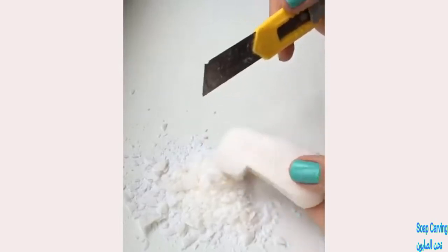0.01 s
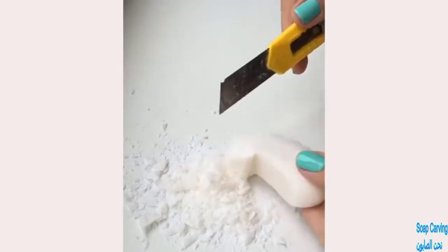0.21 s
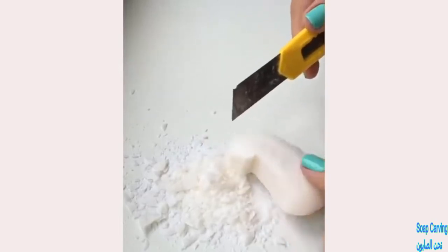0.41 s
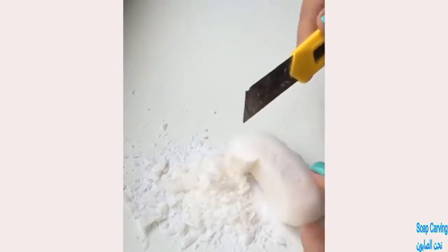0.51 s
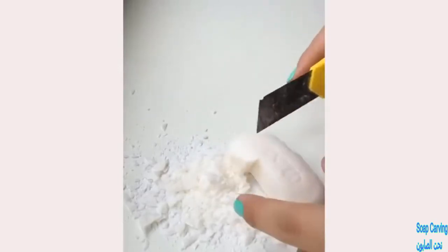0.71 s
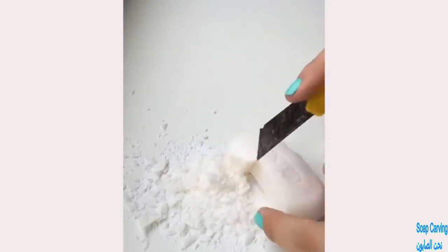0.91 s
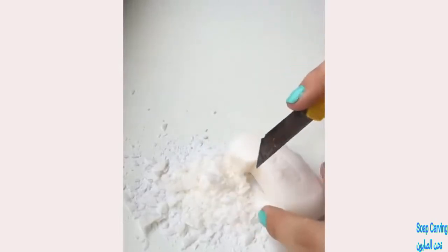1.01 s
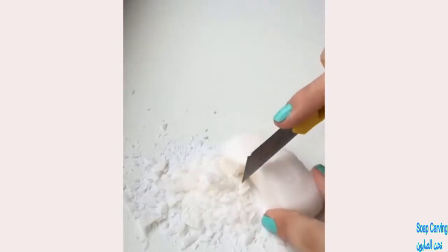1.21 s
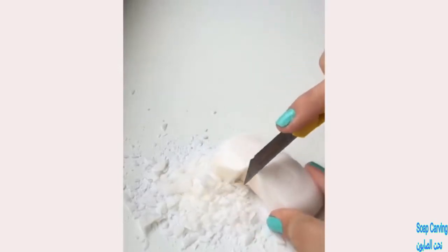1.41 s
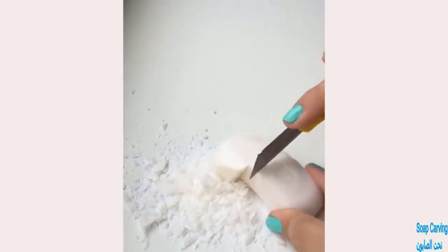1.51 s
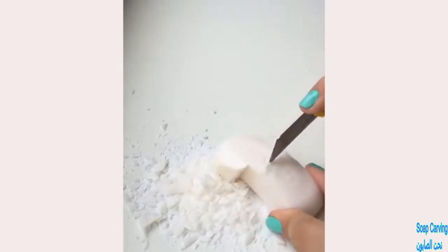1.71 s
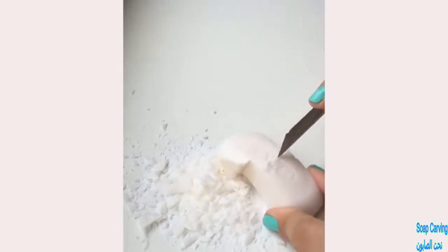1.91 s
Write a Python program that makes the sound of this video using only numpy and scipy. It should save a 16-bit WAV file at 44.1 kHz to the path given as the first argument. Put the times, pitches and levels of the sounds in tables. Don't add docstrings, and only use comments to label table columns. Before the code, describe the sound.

Soap bar knocking on a hollow table: faint shifting and low hum, then one loud, short, boomy woody blow at 0.2 s with a bright crack. Near quiet until a blade tick at 0.79 s and a sharp bite click at 0.9. A soft, dry, crumbly scrape runs uneven to about 1.55 s, with thin metallic singing and low table rumble. Brief scrape at 1.79, crisp release click at 1.84, faint blade ring. Close, small quiet room.

```python
import sys
import numpy as np
from scipy import signal
from scipy.fft import rfft, irfft, next_fast_len
from scipy.io import wavfile
from scipy.ndimage import uniform_filter1d, map_coordinates

SR = 44100
rng = np.random.default_rng(int(sys.argv[2]) if len(sys.argv) > 2 else 0)


def file_out(sig):
    cols = np.atleast_2d(sig).T
    lim = np.clip(cols, -1, 1)
    pcm = np.round(lim * 32767).astype(np.int16)
    wavfile.write(sys.argv[1], SR, pcm)


def amplitude_ratio(level_db):
    exponent = np.asarray(level_db, float) / 20
    return 10 ** exponent


N = 88200
TIME_S = np.arange(N) / SR

# pitch_hz, level_db, t60_s (time to fade by 60 dB)
TABLE_TONES = [(172.5, -13, 0.14), (245.6, -17, .11), (290, -13.5, 0.081), (362.8, -16, 0.11),
               (486, -17, 0.053), (531, -5.5, .06), (640, -3, .045), (780, -17, .05), (1003, -9.5, .035),
               (466.9, 4, 0.011), (1420, -28.5, 0.027), (2026, -22.5, 0.033), (2240, -18.5, 0.033),
               (2580, -25.5, .03)]
# start_s, level_db, contact_ms
TABLE_BLOWS = [(.2007, -5, 0.34), (.268, -35.5, 0.7), (.32, -46, 0.74), (.0705, -52.5, 0.37),
               (.167, -52, .5), (.8176, -43, 0.55), (.9345, -48, 0.25), (.946, -46, 0.74),
               (1.483, -47.5, .5), (1.497, -50.5, 0.76), (1.545, -47.5, 0.9), (1.775, -48, 1.73),
               (1.822, -53.5, 0.6)]
# time_s, scrape_db, table_load_db
LONG_STROKE = [(0, -72.5, -52.5), (.1, -78, -67), (.19, -72, -62.5), (.4, -71.5, -62.5), (.62, -99, -81.5),
               (.81, -74.5, -72.5), (.897, -73, -61), (.915, -54, -59.5), (1.04, -60, -60.5),
               (1.09, -65.5, -70), (1.15, -55.5, -59), (1.21, -60, -63), (1.29, -57.5, -63.5),
               (1.43, -57, -62), (1.489, -54.5, -52), (1.55, -60, -63), (1.6, -70, -71), (1.699, -68, -69)]
SHORT_STROKE = [
    (1.789, -53.5, -58),
    (1.82, -59.5, -63),
    (1.868, -62.5, -73),
    (1.99, -80.5, -79.5),
]


def blows():
    # pitch_hz, level_db
    thud_colour = [(45, -8), (90, -12), (170, -2), (300, 0), (560, -0.76), (1100, -13), (2500, -21.5),
                   (5000, -36)]
    # pitch_hz, t60_s
    thud_fade = [(40, .4), (170, 0.16), (520, .22), (1000, .17), (2500, .15)]
    thud_db, linger_db, linger_times = -21.5, -19.5, 2.2
    attack_s, low_cut_hz = 0.00051, 146
    held_damping, held_tilt_db = 0.69, -3

    slow_fade = [(hz, linger_times * t60) for hz, t60 in thud_fade]
    pitches = np.transpose(TABLE_TONES)[0]
    rung, thuds = np.zeros(N + SR), np.zeros(N + SR)
    t = np.arange(SR // 2) / SR
    for k, (start_s, level_db, contact_ms) in enumerate(TABLE_BLOWS):
        held = k > 0
        changes_db = held * (rng.normal(0, 4, len(TABLE_TONES)) + held_tilt_db * np.log2(pitches / 500))
        ring = np.zeros(len(t))
        for (hz, tone_db, t60), change_db in zip(TABLE_TONES, changes_db):
            fade_db = -60 * t / t60 / held_damping ** held
            ring += amplitude_ratio(tone_db + change_db + fade_db) * np.sin(2 * np.pi * hz * t)
        ring *= 1 - np.exp(-t / attack_s)
        push = np.hanning(int(contact_ms * SR / 1000) + 3)
        start = round(start_s * SR)
        rung[start:][:len(t)] += amplitude_ratio(level_db) * np.convolve(ring, push / push.sum())[:len(t)]
        thud = decaying(thud_fade) + amplitude_ratio(linger_db) * decaying(slow_fade)
        thuds[start:][:len(t)] += amplitude_ratio(level_db + thud_db) * thud * (1 - np.exp(-t / 0.001))

    colour = lambda f: amplitude_ratio(along(thud_colour + [(12000, -69.5)], f))
    loss = np.sqrt(np.mean(colour(np.linspace(0, SR / 2, 2000)) ** 2))
    after_hard_blow = TIME_S > TABLE_BLOWS[0][0]
    thuds = filtered(thuds, colour)[:N] / loss * after_hard_blow
    return filtered(rung[:N], lambda f: (1j * f / (low_cut_hz + 1j * f)) ** 2) + thuds


def snaps():
    # peak_s, level_db, rise_ms, t60_ms
    snap_groups = [
        [(.2012, -24.5, 0.46, 20), (.2055, -25.5, 1.6, 22)],
        [(.7905, -41, 0.34, 23), (.808, -58.5, 1.47, 25), (.82, -60, 1.7, 25), (.843, -60.5, 1.1, 35),
         (1.468, -50.5, 3.4, 60), (1.484, -50.5, .6, 29), (1.497, -53.5, 1.1, 39)],
        [(.8982, -35, 1.07, 18), (.9000, -25.5, 0.68, 12), (.9025, -34.5, 0.53, 14), (.910, -48, 2.5, 60),
         (.968, -51.5, 1.2, 33), (1.178, -55, 0.46, 12), (1.822, -64, 0.61, 15)],
        [(1.8403, -31.5, 0.54, 12.3), (1.8445, -40.5, 1.1, 14), (1.853, -53.5, 2.5, 70), (1.546, -52, 2.4, 42),
         (1.5, -57.5, 2.8, 140)],
        [(.002, -52.5, 0.5, 41), (.03, -65, 1.8, 46), (.071, -60, 0.91, 25), (.142, -61.5, 1, 36),
         (.168, -61, 1.1, 58), (.42, -68, 6, 82)],
        [(.2097, -30.5, .4, 18), (.003, -66, .6, 55), (.055, -66, 7.6, 170), (.085, -63.5, 1.2, 30),
         (.185, -62, 6.2, 54), (.238, -58, 1.1, 60)],
    ]
    # pitch_hz, width_hz, level_db
    snap_peaks = [
        [(2220, 500, 3.5), (3800, 1100, 1.5), (5190, 400, 2.5), (7530, 500, -7.5), (9050, 300, -14),
         (12200, 500, -3)],
        [(1680, 720, -12.5), (2600, 260, 5), (3700, 270, -1), (5640, 210, 7.5), (7800, 240, -5),
         (10460, 400, -20), (12270, 490, -12)],
        [(2660, 400, 1.5), (4720, 450, 0.5), (6100, 370, -3), (7080, 470, 5), (8610, 440, -1), (9580, 490, 3),
         (10250, 310, -1), (12900, 690, 0)],
        [(1480, 136, -14), (2960, 320, 6), (4100, 260, -4.5), (5370, 200, 1.5), (6500, 210, -8),
         (9100, 320, -7.5), (11300, 220, -2.5), (12000, 340, 1.5), (13130, 550, -6.5)],
        [(2200, 360, 2), (3100, 500, -3.5), (4120, 500, 1), (5300, 300, -2.5), (8500, 900, -9.5)],
        [(8600, 900, -4.5), (10800, 1200, -1), (12800, 1200, 1.5)],
    ]
    plain_db = [-3, -6, -6.5, -13.5, -14, -12]
    low_cuts = [1500, 909, 1880, 1900, 1200, 4000]
    first_cracks = [3, 2.9, 3.9, 2.8, 1.5, 3.5]

    lead = -(-SR // 40)
    t = np.arange(-lead, SR // 8) / SR
    out = np.zeros(N + SR)
    for rows, peaks, noise_db, low_hz, crack in zip(snap_groups, snap_peaks, plain_db, low_cuts, first_cracks):
        colour = lambda f: (amplitude_ratio(noise_db) + ringing(peaks, f)) * (1j * f / (low_hz + 1j * f)) ** 3
        for peak_s, level_db, rise_ms, t60_ms in rows:
            swell = np.exp(-(t * 600 / rise_ms) ** 2)
            fade = amplitude_ratio(-60000 * np.maximum(t, 0) / t60_ms)
            noise = np.where(t == 0, -crack, rng.standard_normal(len(t)))
            burst = filtered(noise * np.where(t < 0, swell, fade), colour)
            out[round(peak_s * SR):][:len(t)] += amplitude_ratio(level_db) * burst / np.std(filtered(noise, colour))
    return out[lead:][:N]


def scraping():
    # pitch_hz, level_db
    crumble_colour = [(300, -36), (1000, -3), (2200, -3), (4000, -1.5), (8000, -2.5), (14000, 0.5)]
    # pitch_hz, width_hz, level_db
    blade_tones = [(1454, 220, -4), (3000, 100, -5.5), (4080, 200, -4), (5500, 200, -2), (5680, 170, -0.5),
                   (5930, 170, -2), (6992, 150, -10.5), (8300, 300, -8), (10900, 400, -8.5),
                   (11900, 640, -8), (13700, 300, -7.5)]
    # time_s, level_db
    sing_level = [(0, -16), (1.05, -12.5), (1.14, -11), (1.3, -6.5), (1.45, -3.5), (1.6, -12.5), (1.75, -8),
                  (2, -13.5)]

    rub = rubbing()
    crumble = patchy(filtered(rub, lambda f: amplitude_ratio(along(crumble_colour, f))), depth_db=3.0)
    blade = lambda f: np.sqrt(sum(abs(ringing([tone], f)) ** 4 for tone in blade_tones))
    sing = patchy(filtered(rub[::-1], blade), depth_db=1.17)
    sing *= amplitude_ratio(np.interp(TIME_S, *np.transpose(sing_level)))
    time_s, scrape_db, _ = np.transpose(LONG_STROKE + SHORT_STROKE)
    return (crumble + sing) * amplitude_ratio(np.interp(TIME_S, time_s, scrape_db) + 1.3 * wobble(45))


def table_load():
    # pitch_hz, level_db
    load_colour = [(90, -16), (170, 3.5), (500, -7), (1100, -16), (2500, -17)]

    wood = [(hz, 4.1 / t60, -.1) for hz, _, t60 in TABLE_TONES[:9]]
    pressure = rng.standard_normal(N) * amplitude_ratio(2.2 * wobble(30))
    colour = lambda f: amplitude_ratio(along(load_colour, f)) * (.2 + np.abs(ringing(wood, f)))
    time_s, _, load_db = np.transpose(LONG_STROKE + SHORT_STROKE)
    return unit(filtered(pressure, colour)) * amplitude_ratio(np.interp(TIME_S, time_s, load_db))


def sliding_bar():
    # time_s, level_db
    slide_level = [(0, -68), (.03, -69), (.06, -77), (.108, -86), (.13, -67), (.155, -76), (.175, -69),
                   (.195, -71.5), (.2, -110)]
    # pitch_hz, width_hz, level_db
    slide_peaks = [(1700, 250, -2), (2250, 160, 1.5), (4000, 900, -8.5)]

    slide = patchy(filtered(rubbing(), lambda f: ringing(slide_peaks, f)), depth_db=3.5)
    return slide * amplitude_ratio(np.interp(TIME_S, *np.transpose(slide_level)))


def drone():
    # time_s, level_db
    drone_level = [(0, -52.5), (.065, -62.5), (.108, -57), (.135, -67), (.16, -60), (.195, -58), (.2, -110)]
    pitch_hz, waver_turns = 171, .12

    level = np.sqrt(2) * amplitude_ratio(np.interp(TIME_S, *np.transpose(drone_level)))
    return level * np.sin(2 * np.pi * (pitch_hz * TIME_S + waver_turns * wobble(22)))


def table_afterring():
    # pitch_hz, level_db, t60_s
    slow_tones = [(167, -29, .25), (253, -41.5, .35), (371, -37.5, .29), (415, -40, .25), (524, -40.5, .39),
                  (654, -44.5, .33), (698, -45.5, .27), (790, -51.5, .4), (1027, -50.5, .25)]
    return rings(TABLE_BLOWS[0][0], slow_tones, waver_db=3.5)


def freed_blade():
    # pitch_hz, level_db, t60_s
    free_tones = [(2530, -63, 0.12), (3010, -60, 0.25), (3300, -68, 0.11), (4100, -60, .17),
                  (5146, -65.5, 0.23), (6395, -68, .16), (7574, -64, 0.11)]
    return rings(1.842, free_tones, waver_db=4.3)


def room(x):
    # pitch_hz, t60_s
    room_fade = [(100, 0.57), (500, .3), (2000, .22), (6000, .14), (14000, 0.068)]
    delay_s = .006

    tail = decaying(room_fade)
    delayed = np.pad(x, (int(delay_s * SR), 0))
    return signal.fftconvolve(delayed, tail / np.linalg.norm(tail))[:N]


def quiet():
    # pitch_hz, level_db
    hiss_colour = [(12, -34), (20, -6), (79, -9.5), (346, -27), (809, -23.5), (1520, -30.5), (1840, -30),
                   (2930, -31), (14000, -33.5)]
    # pitch_hz, level_db
    rumble_colour = [(20, -11), (42, 0.33), (70, -3.5), (120, -2), (200, -35)]
    hiss_db, rumble_db = -70.5, -68
    shove_s, shove_db, shove_hz = 1.226, -51, 55

    hiss = unit(filtered(rng.standard_normal(N), lambda f: amplitude_ratio(along(hiss_colour, f))))
    lumps = rng.standard_normal(N) * amplitude_ratio(3 * wobble(11))
    rumble = unit(filtered(lumps, lambda f: amplitude_ratio(along(rumble_colour + [(600, -93.5)], f))))
    t = TIME_S - shove_s
    shove = np.exp(-(t * shove_hz * 1.8) ** 2) * -np.sin(2 * np.pi * shove_hz * t)
    return amplitude_ratio(hiss_db) * hiss + amplitude_ratio(rumble_db) * rumble + amplitude_ratio(shove_db) * shove


def rubbing():
    grains_per_s, spread_db, grain_db = 4000, 1.5, -7.5
    breaks = rng.random(N) < grains_per_s / SR
    grains = breaks * amplitude_ratio(spread_db * rng.exponential(size=N)) * rng.standard_normal(N)
    return rng.standard_normal(N) + amplitude_ratio(grain_db) * unit(grains)


def rings(start_s, tones, waver_db):
    t = np.maximum(TIME_S - start_s, 0)
    out = np.zeros(N)
    for hz, level_db, t60 in tones:
        level = amplitude_ratio(level_db - 60 * t / t60 + waver_db * wobble(25))
        out += level * np.sin(2 * np.pi * hz * t + .4 * wobble(25))
    return out * (1 - np.exp(-t / .004))


def decaying(t60s):
    hz, t, z = signal.stft(rng.standard_normal(SR // 2), SR, nperseg=256)
    fade = amplitude_ratio(-60 * t / along(t60s, hz)[:, None])
    return signal.istft(z * fade, SR, nperseg=256)[1][:SR // 2]


def patchy(x, depth_db):
    z = signal.stft(x, nperseg=256)[2]
    field = uniform_filter1d(rng.standard_normal(z.shape), 3, 0)
    field = uniform_filter1d(field, 12, 1)
    return unit(signal.istft(z * amplitude_ratio(depth_db * unit(field)), nperseg=256)[1][:N])


def ringing(peaks, f):
    total = 0
    for k, (hz, width, db) in enumerate(peaks):
        total = total + (-1) ** k * amplitude_ratio(db) * 1j * f * width / (hz * hz - f * f + 1j * f * width)
    return total


def filtered(x, response):
    m = next_fast_len(len(x) + SR // 2)
    return irfft(rfft(x, m) * response(np.fft.rfftfreq(m, 1 / SR)), m)[:len(x)]


def along(points, hz):
    f, v = np.transpose(points)
    return np.interp(np.log(hz + 1), np.log(f + 1), v)


def wobble(rate):
    knots = rng.standard_normal(int(N * rate / SR) + 4)
    return map_coordinates(knots, [np.arange(N) * rate / SR])


def unit(x):
    return x / np.sqrt(np.mean(x ** 2) + 1e-20)


def scene():
    low, high = blows(), snaps()
    echoes = amplitude_ratio(-21) * (room(low) + amplitude_ratio(1.0) * room(high))
    strokes = scraping() + table_load() + sliding_bar()
    tails = table_afterring() + freed_blade() + drone()
    return (low + high + echoes + strokes + tails + quiet())[None]


def roll_off(x):
    return signal.sosfilt(signal.butter(12, 15080, fs=SR, output="sos"), x)


def record(dry):
    dip_s, dip_ms, dip_db = .1955, 2.2, -25.5
    top_hz, top_db_per_khz, skirt_db, skirt_db_per_khz = 13800, 130, 36, 11

    dip = amplitude_ratio(dip_db * np.exp(-((TIME_S - dip_s) * 1000 / dip_ms) ** 4))

    def treble_end(f):
        over_khz = np.maximum(f - top_hz, 0) / 1000
        return amplitude_ratio(-np.minimum(top_db_per_khz * over_khz, skirt_db + skirt_db_per_khz * over_khz))

    mix = filtered(dry[0] * dip, treble_end)
    return roll_off(mix[None])


dry = scene()
out = record(dry)
file_out(out)
```